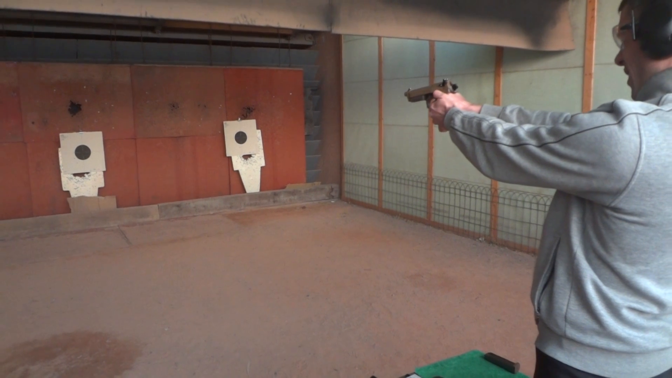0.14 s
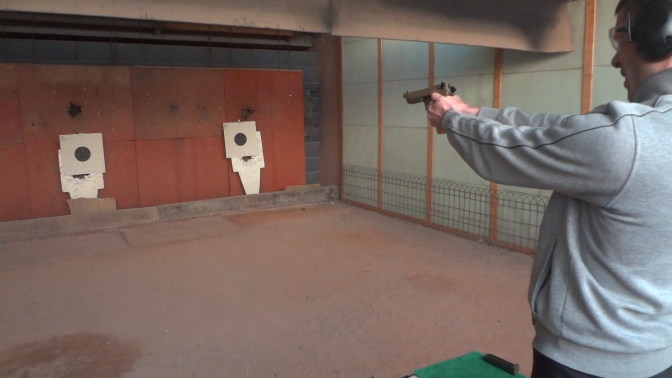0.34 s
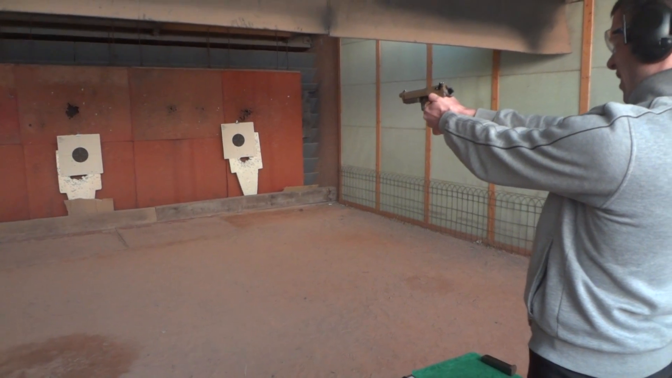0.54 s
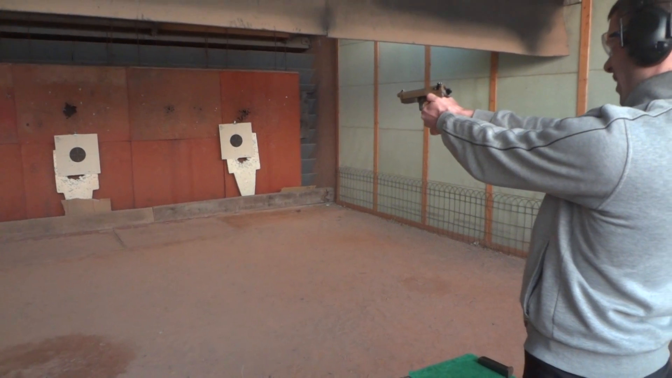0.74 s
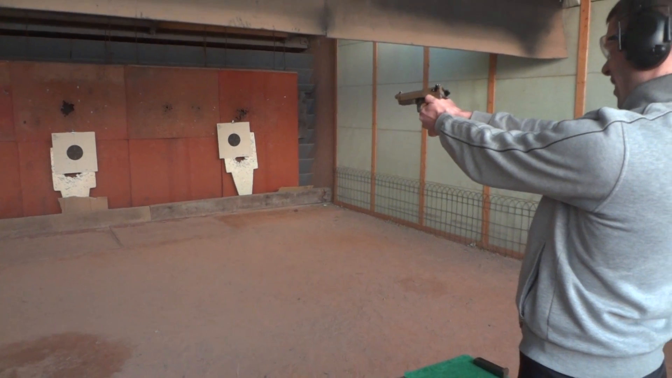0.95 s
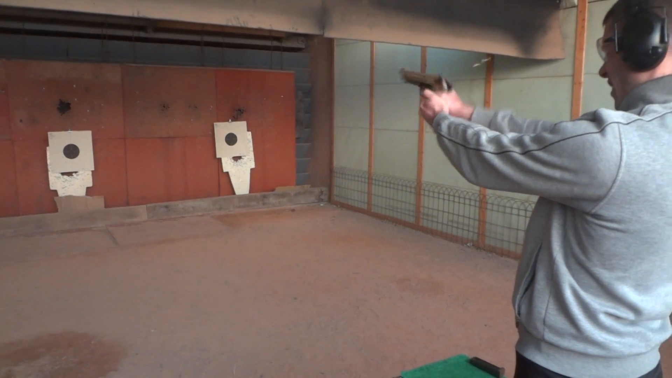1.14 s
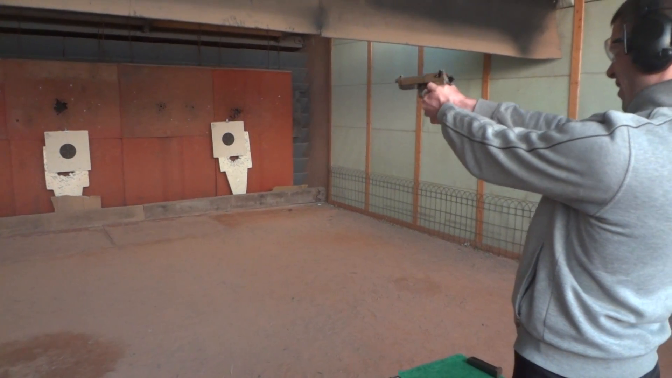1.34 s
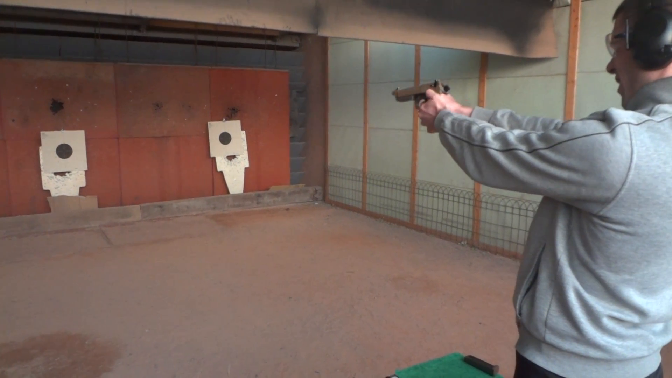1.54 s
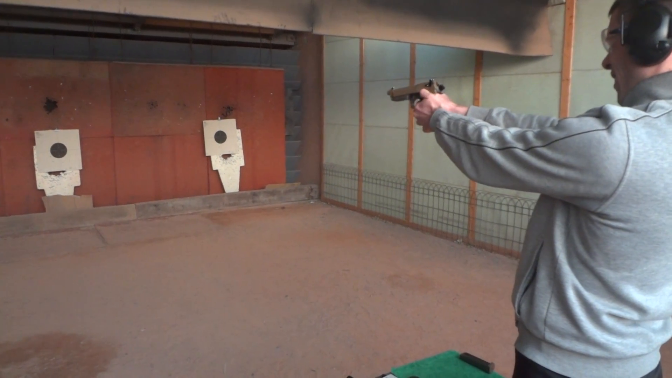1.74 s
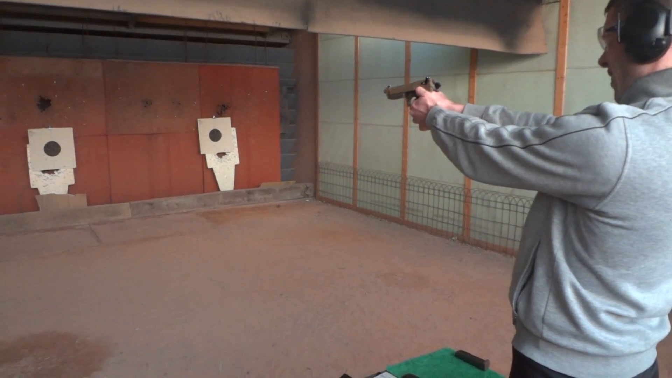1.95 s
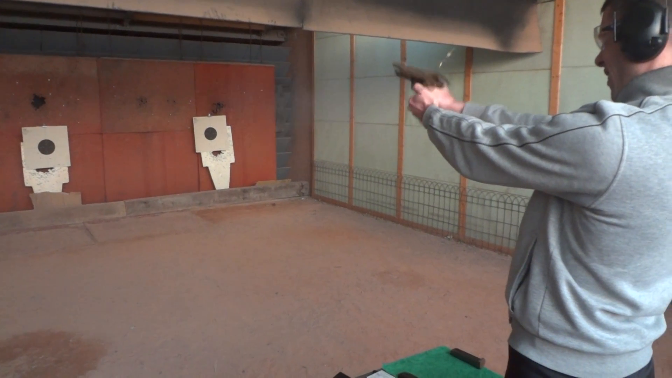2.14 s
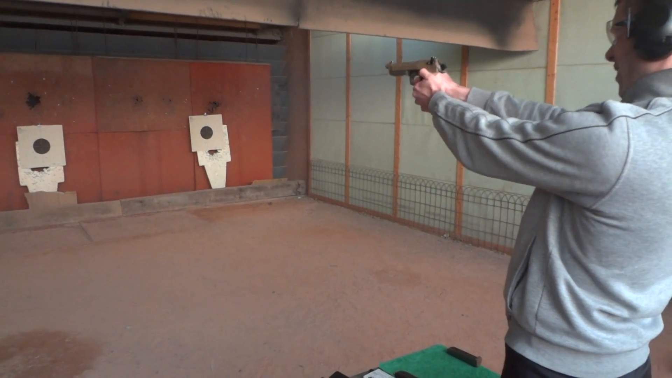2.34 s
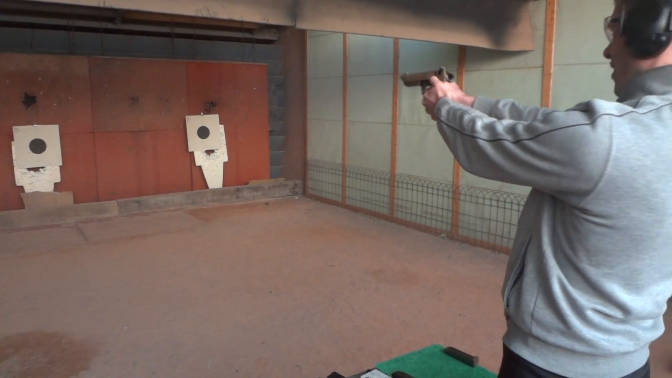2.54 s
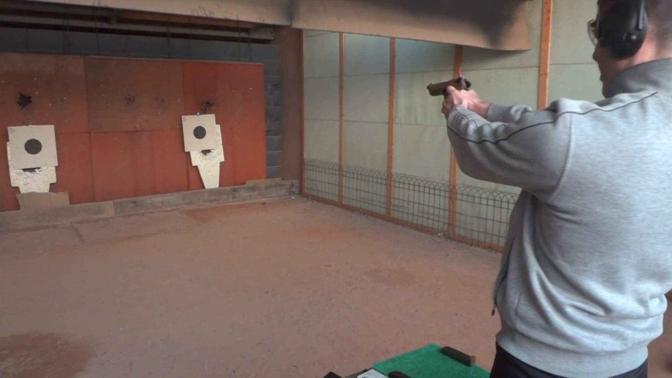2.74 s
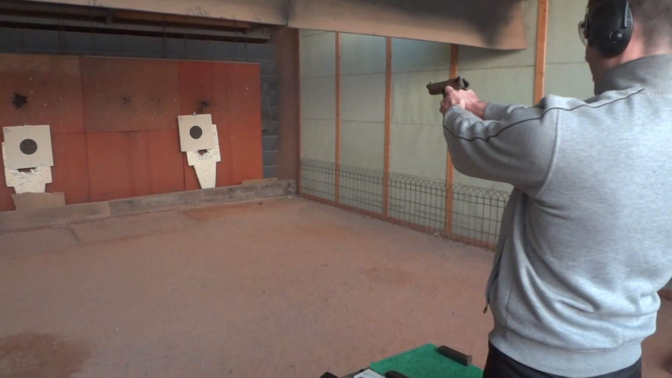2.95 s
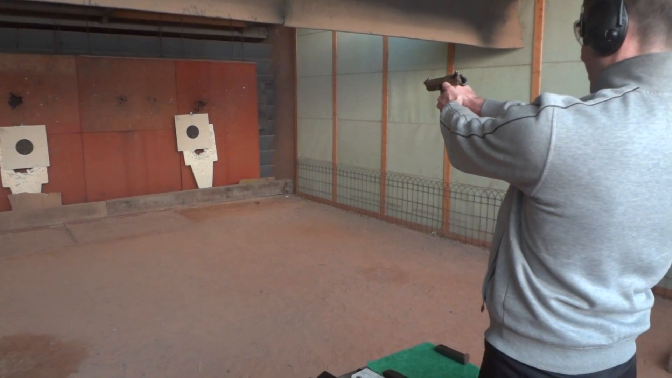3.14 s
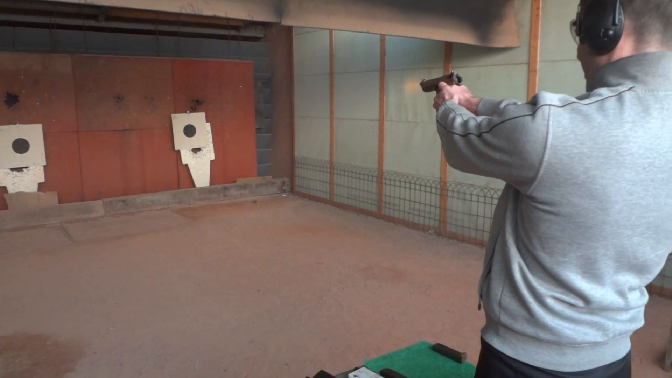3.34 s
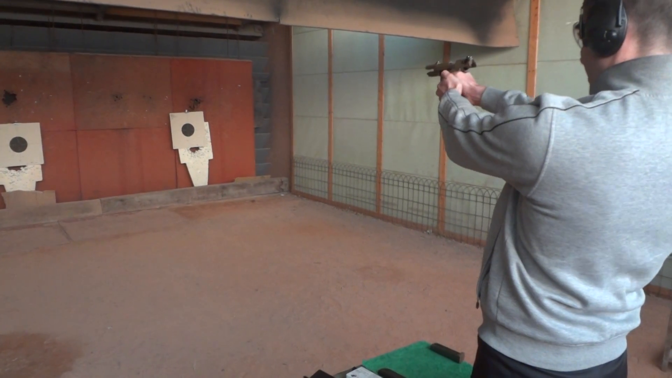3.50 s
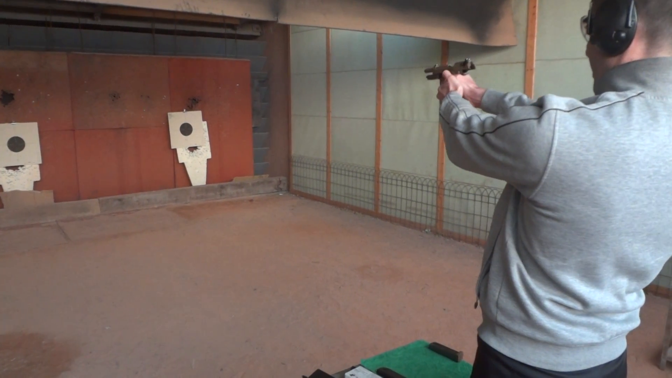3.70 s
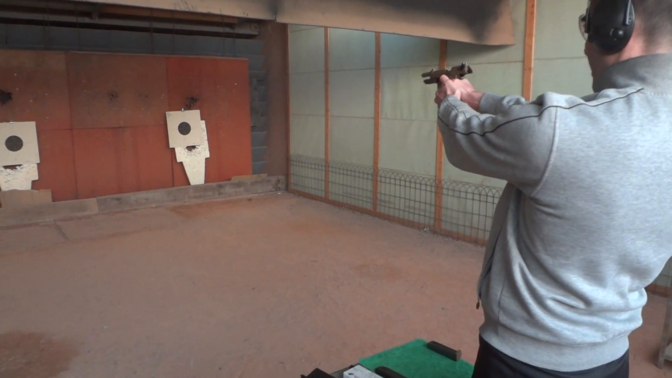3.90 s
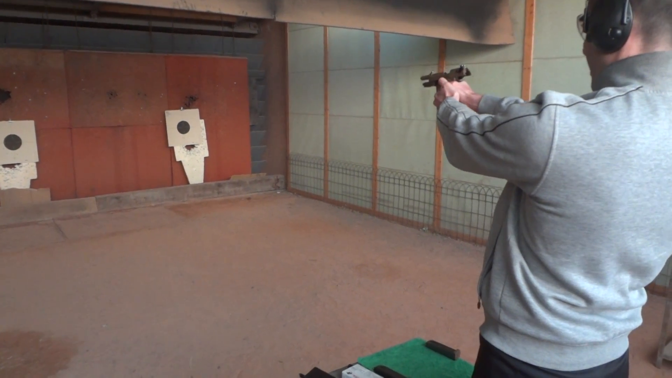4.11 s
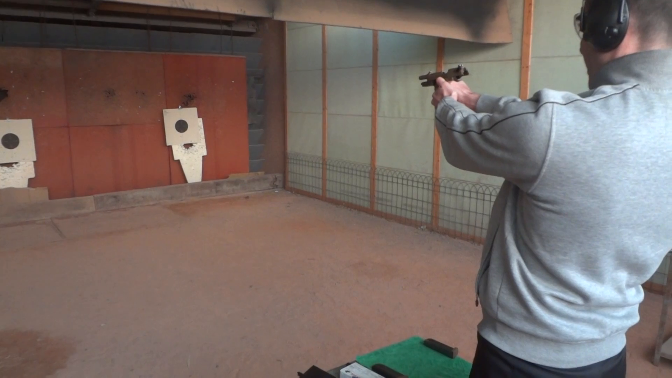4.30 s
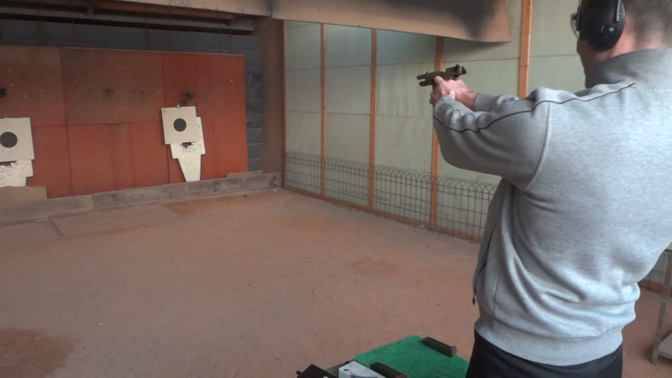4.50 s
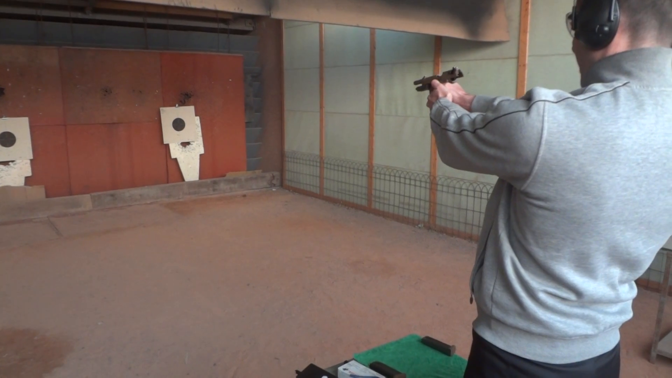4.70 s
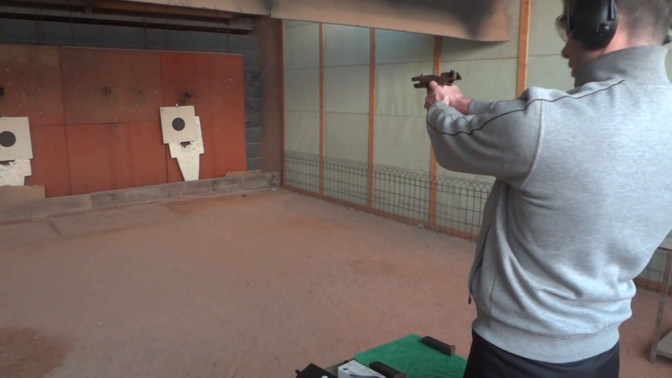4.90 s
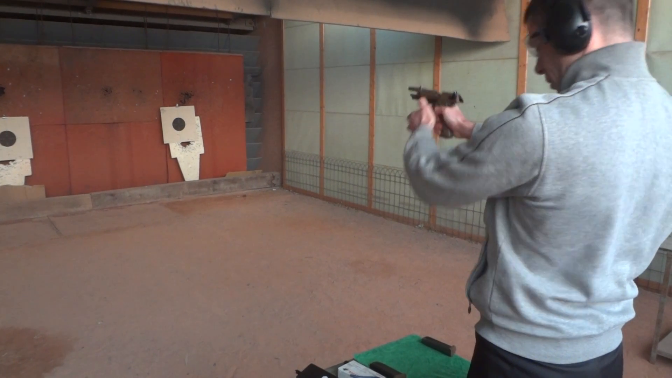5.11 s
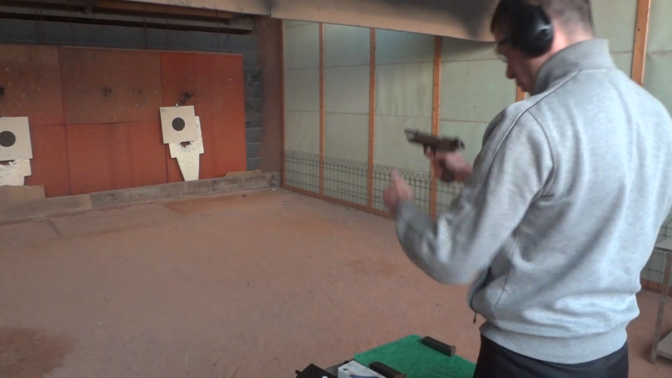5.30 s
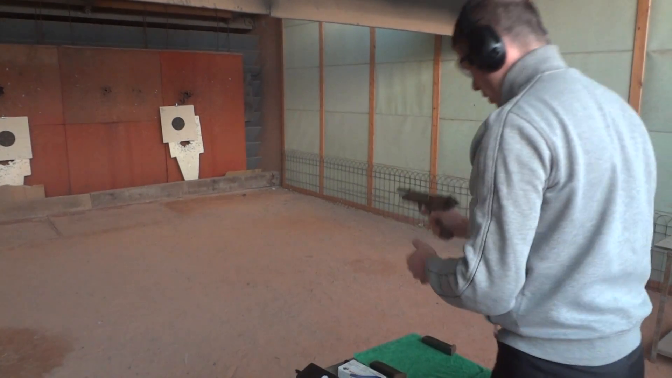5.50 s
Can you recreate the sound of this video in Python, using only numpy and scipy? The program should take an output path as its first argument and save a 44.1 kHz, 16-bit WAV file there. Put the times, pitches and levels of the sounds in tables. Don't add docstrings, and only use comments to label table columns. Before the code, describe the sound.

In a hard-walled indoor shooting range, low ventilation hum runs for about a second before three spaced pistol shots. Each cracks sharply, then a dense, compressed roar echoes off the walls and dies away. Brass cases ping and knock on bench and floor after each shot. The fans fade and cloth faintly rustles at the end. A small stereo camera microphone near the shooter overloads.

```python
import sys
import numpy as np
from scipy import signal
from scipy.fft import rfft, irfft
from scipy.io import wavfile

SR = 44100
rng = np.random.default_rng(int(sys.argv[2]) if len(sys.argv) > 2 else 0)


def master_out(mix):
    frames = np.transpose(np.atleast_2d(mix))
    ceiling = np.clip(frames, -1, 1)
    pcm = np.round(ceiling * 32767).astype(np.int16)
    wavfile.write(sys.argv[1], SR, pcm)


def nominal_scale(level):
    x = np.asarray(level, float) / 20
    return 10 ** x


N = 245195
TAIL = int(2.2 * SR)


def sine(hz, t):
    return np.sin(2 * np.pi * hz * t)


def bump(t, centre_s, width_s):
    return np.exp(-((t - centre_s) / width_s) ** 2)


def fade(t, t60):
    return np.exp(-np.log(1000) * t / np.maximum(t60, .003))


def build(t, rise):
    return 1 - np.exp(-(t / rise) ** 3)


def arrive(t, hz):
    return 1 - np.exp(-t * hz / 5.4)


def on_log(hz, table, column):
    rows = np.array(table, float)
    return np.interp(np.log(np.maximum(hz, 1)), np.log(rows[:, 0]), rows[:, column])


def band(x, hz, octaves):
    f = np.maximum(np.fft.rfftfreq(x.shape[-1], 1 / SR), 1)
    y = irfft(rfft(x) * np.exp(-(np.log2(f / hz) / octaves) ** 2), x.shape[-1])
    return y / np.sqrt(np.mean(y ** 2))


def add(out, s, x):
    i = int(s * SR)
    out[..., i:i + x.shape[-1]] += x[..., :N - i]


# (frequency [Hz], level per band at the blast [dB], t60 [s])
HALL_BANDS = [(45, -18.5, 0.18), (90, -20, 0.8), (150, -14.5, .6), (260, -2, .58), (430, 2, 0.41),
              (700, 8.5, 0.43), (1020, 5, 0.5), (1565, 0.5, 0.39), (2200, -3, 0.44), (3500, -1.5, 0.45),
              (5900, -5.5, 0.44), (9000, -4.5, .36), (12100, -7.5, .31), (14400, -11, 0.5),
              (16000, -12, .22)]
# (delay [s], level over the roar [dB])
WALL_ECHOES = [(.022, 1), (.043, 3.5), (0.065, 2.5), (.087, 6.5), (.121, -0.5), (.138, 7.5), (.152, 1.5),
               (.2, 7.5), (.247, 7), (.3, 7.5)]
PATCHY_DB, PATCHY_HZ = 2.0, 14.


def hall_air(pattern, fresh, kept, stretch):
    t, out = np.arange(TAIL) / SR, 0
    slaps = 1 + sum((nominal_scale(db) - 1) * bump(t, s, 0.0022) for s, db in WALL_ECHOES)
    flutter = 1 + 0.058 * np.cos(2 * np.pi * 44 * t)
    for hz in 40 * 2 ** np.arange(0, 8.8, .4):
        same = np.clip(kept, 0, 1) ** (1 + hz / 700)
        air = band(same * pattern + np.sqrt(1 - same ** 2) * fresh, hz, 0.26)
        air *= nominal_scale(PATCHY_DB * min(900 / hz, 1) * band(rng.standard_normal(TAIL), PATCHY_HZ, 0.95))
        longest_t60 = .57 * (4000 / hz) ** .45
        t60 = stretch * min(on_log(hz, HALL_BANDS, 2), longest_t60)
        sharp = (slaps * flutter) ** (kept * min(hz / 1800, 1))
        out = out + air * sharp * arrive(t, hz) * nominal_scale(on_log(hz, HALL_BANDS, 1)) * fade(t, t60)
    return out


BOOTH_DB, BOOTH_HZ, BOOTH_T60_S = 15, 1102, 0.043
WHOOP_DB, WHOOP_HZ, WHOOP_HZ_PER_S = 12.5, 268.6, 9500
WHOOP_PEAK_S, WHOOP_WIDTH_S = .03, .022


def booth_and_whoop(t, kept):
    booth = nominal_scale(BOOTH_DB) * fade(t, BOOTH_T60_S) * sine(BOOTH_HZ, t)
    whoop = sine(WHOOP_HZ + WHOOP_HZ_PER_S * t / 2, t) * bump(t, WHOOP_PEAK_S, WHOOP_WIDTH_S)
    return nominal_scale(WHOOP_DB) * kept * whoop - booth


# (frequency [Hz], t60 [s], level after shot 1, 2, 3 [dB], build-up
# [s])
PANEL_MODES = [(119.7, 0.9, -16, -23, -21.5, .1), (229.4, 0.44, 9.5, 7, 3.5, 0.12),
               (259, 2.3, -35.5, -42.5, -51.5, .1), (255.2, 0.51, 3.5, 5, 0, 0.21),
               (471, 0.44, -2, -4.5, -10.5, 0.037), (528, 0.25, -21.5, -9.5, -12.5, 0.075),
               (639, 0.4, 5.5, 5.5, 6, 0.18), (653, 2.2, -47, -48.5, -60, .1),
               (665, 0.49, 0, 3, -3.5, 0.024), (700, .42, 1, 2, -2.5, 0.047), (744, 0.48, 7, 6, 6, .08),
               (784, 0.47, 12, 12, 11.5, 0.12),
               (852.2, 2, -35.5, -51.5, -56, .1), (858, 0.26, -6, 2, -4, 0.044),
                (920, 0.31, -10, -1, 1, .04), (997, 0.41, -4, -5, -2.5, .05),
                (1343, 0.55, -15, -20, -25, .06), (2260, 0.62, -23, -36, -40.5, .06),
                (4500, 0.47, -25, -32, -35.5, 0.054)]


def panels(t, shot):
    out = np.zeros(TAIL)
    for hz, t60, *db, rise in PANEL_MODES:
        restless = nominal_scale((1.54 + hz / 900) * band(rng.standard_normal(TAIL), 4.0 + hz / 250, 1.0))
        out += nominal_scale(db[shot]) * restless * build(t, rise) * fade(t, t60) * sine(hz, t)
    return out


# (frequency [Hz], t60 [s], level after shot 1, 2, 3 [dB], build-up [s])
TWIN_MODES = [(47.8, 1.3, -20.5, -23, -25.5, 0.21), (755.5, 0.75, -34.5, -36.5, -13.5, 0.25),
              (356.2, 2.14, -24.5, -27.5, -43, 0.12)]
TWIN_BEAT_HZ = [3.05, 1.9, .735]


def twin_panels(t, shot):
    out = np.zeros(TAIL)
    for (hz, t60, *db, rise), beat in zip(TWIN_MODES, TWIN_BEAT_HZ):
        pair = sine(hz + beat / 2, t) + .88 * sine(hz - beat / 2, t)
        out += nominal_scale(db[shot]) * build(t, rise) * fade(t, t60) * pair
    return out


def hall(pattern, kept, stretch, linger_db, shot):
    t = np.arange(TAIL) / SR
    fresh = rng.standard_normal((2, TAIL))
    out = hall_air(pattern, fresh, kept, stretch)
    out += nominal_scale(linger_db) * band(fresh, 220., 1.3) * fade(t, 1.5)
    out[0] += booth_and_whoop(t, kept) + panels(t, shot) + twin_panels(t, shot)
    return out


# (time [s], hall level [dB], crack level [dB],
# share of the hall echo pattern kept from the first stance [0-1], lingering rumble level [dB])
BLASTS = [
    (1.1406, 1.5, -15, 0.94, -31),
    (2.1608, -1.5, -12, .93, -39.5),
    (3.4076, -4, -14.5, .55, -41.5),
]
DEAF_S = .0066
DECAY_STRETCH, STRETCH_PER_DB = 0.82, 0.0107


def shots():
    out, pattern = np.zeros((2, N)), rng.standard_normal((2, TAIL))
    for k, (s, db, _, kept, linger_db) in enumerate(BLASTS):
        out[:, int((s + .001) * SR):] = 0
        stretch = DECAY_STRETCH + STRETCH_PER_DB * db
        add(out, s + DEAF_S, nominal_scale(db) * hall(pattern, kept, stretch, linger_db, k))
    return out


CRACK_S = .0021
HAMMER_DB, HAMMER_HZ, HAMMER_EARLY_S = -47, 4200, .006


def muzzle_cracks():
    out, t = np.zeros((2, N)), np.arange(SR // 2) / SR
    for s, _, db, *_ in BLASTS:
        noise = rng.standard_normal(len(t))
        torn = np.tanh(0.99 * band(noise, 3200.0, .9) + .6 * band(noise, 9000.0, .5))
        torn *= np.minimum(t / .001, 1) ** 2 * (t < CRACK_S)
        late = np.maximum(t - CRACK_S, 0)
        slack = .5 * (t >= CRACK_S) * np.exp(-late / 0.0042) * np.cos(2 * np.pi * 150 * late)
        add(out, s, nominal_scale(db) * (torn + slack) * nominal_scale([[-.5], [.5]]))
        hammer = band(noise[::-1], HAMMER_HZ, .7) * fade(t, .03)
        add(out, s - HAMMER_EARLY_S, nominal_scale(HAMMER_DB) * hammer)
    return out


# (time [s], peak level [dB], centre [Hz], left minus right [dB])
CASE_KNOCKS = [(1.97, -55, 3970, -10), (1.976, -55, 9000, 7.5), (2.851, -44, 554, -7),
               (2.861, -46, 700, -10), (2.88, -51, 790, -1.5), (2.897, -52.5, 700, -5),
               (3.108, -54, 1300, -11), (3.1085, -49, 3250, -8), (3.1155, -56.5, 3500, -7),
               (3.121, -54, 2780, -9), (3.1295, -56, 9000, 3), (4.037, -58, 3794, 0),
               (4.046, -63, 4200, 0.5), (4.064, -68, 4990, 0), (4.1324, -51, 6470, 4),
               (4.141, -58, 6300, -8.5), (4.156, -63, 6800, -1), (4.2158, -47.5, 1120, -7),
               (4.2165, -63, 2200, -4), (4.2166, -54, 4500, -6), (4.2245, -47, 11000, -0.5),
               (4.392, -68, 5000, 0), (4.5824, -56, 4165, -1), (5.31, -66, 4500, 8)]
KNOCK_T60_S, KNOCK_T60_SLOPE = 0.034, -0.76
TICK_DB, TICK_T60_S = -7, .008


def case_knocks():
    out, t = np.zeros((2, N)), np.arange(8192) / SR
    for s, db, hz, pan_db in CASE_KNOCKS:
        noise = rng.standard_normal((2, 8192))
        burst = band(noise, hz, 0.46) * np.minimum(t * hz / 0.65, 1)
        t60 = KNOCK_T60_S * (hz / 1000) ** KNOCK_T60_SLOPE
        burst *= fade(t, t60) + 0.1 * fade(t, 0.37)
        burst += (hz > 1000) * nominal_scale(TICK_DB) * band(noise, 2.7 * hz, 1.6) * fade(t, TICK_T60_S)
        pan = nominal_scale(db + np.array([[pan_db], [-pan_db]]) / 2)
        add(out, s, pan * (burst[0] + 0.11 * burst * [[1], [-1]]) / 2)
    return out


# (time [s], level [dB], frequency [Hz], beat [Hz], t60 [s])
CASE_PINGS = [
    (1.977, -58.5, 11000, 57, 0.17),
    (2.311, -43, 10980, 2, 0.44),
    (3.131, -65.5, 11020, 35, 0.41),
    (3.79, -70.5, 8350, 20, .12),
    (4.105, -73, 9000, 15, 0.19),
    (4.105, -82, 13350, 12, 0.21),
    (4.2165, -50.5, 10960, 45.4, 0.12),
]


def case_pings():
    out, t = np.zeros((2, N)), np.arange(SR // 2) / SR
    for s, db, hz, beat, t60 in CASE_PINGS:
        pair = sine(hz - beat / 2, t) + .7 * sine(hz + beat / 2, t)
        add(out, s, nominal_scale(db) * pair * fade(t, t60) * np.minimum(t / .004, 1) * nominal_scale([[-1.5], [1.5]]))
    return out


RUSTLE_END_S, RUSTLE_DB, RUSTLE_DB_PER_S = 5.536, -74, 28


def sleeve():
    t = np.arange(N) / SR
    rustle = band(rng.standard_normal((2, N)), 850., .5)
    return rustle * nominal_scale(RUSTLE_DB + RUSTLE_DB_PER_S * (t - RUSTLE_END_S))


# (frequency [Hz], level [dB])
MOTOR_LINES = [(48.2, -77), (99.9, -74.5), (121.1, -70.5), (221.1, -75.5), (242.2, -81), (295.6, -75),
               (300, -81), (412, -80.5), (834.7, -71.5)]
# (frequency [Hz], level per Hz [dB])
DUCT_AIR = [(12, -45.5), (20, -13), (54, -9), (118, 1.5), (141, -5), (172, -16.5), (299, -5.5),
            (349, -13.5), (520, -16.5), (742, -16), (829, -10.5), (990, -20.5), (4000, -33), (5200, -63),
            (8800, -120)]
DUCT_DB = -64.5
FAN_OFF_S, FAN_RUNDOWN_S, FAN_DROP_DB = 2.7, .9, -9
MOTOR_DROP_DB = -3


def ventilation():
    t, f = np.arange(N) / SR, np.fft.rfftfreq(N, 1 / SR)
    air = irfft(rfft(rng.standard_normal((2, N))) * nominal_scale(on_log(f, DUCT_AIR, 1)), N)
    air *= nominal_scale(DUCT_DB) / np.std(air)
    for hz, db in MOTOR_LINES:
        waver = nominal_scale(3.0 * band(rng.standard_normal(N), 5., 1.1))
        line = np.sin(2 * np.pi * (hz * t + rng.random()))
        air[0] += np.sqrt(2) * nominal_scale(db + MOTOR_DROP_DB * (t > FAN_OFF_S)) * waver * line
    fan_db = FAN_DROP_DB * (1 - np.exp(-np.maximum(t - FAN_OFF_S, 0) / FAN_RUNDOWN_S))
    return air * nominal_scale(fan_db)


# (frequency [Hz], likeness [0-1], left lead [rad], left minus right [dB])
MIC_PORTS = [(30, .995, -.2, -.8), (125, .99, -.5, -1.6), (250, .97, -.5, -2.3), (600, .95, -.65, -4.2),
             (1200, .75, -.45, -4.8), (2500, .74, -.1, -2.8), (5000, .8, .1, -.9), (9000, .93, 0, -.4),
             (14000, .98, 0, -.2)]


def ports(fields):
    f = np.fft.rfftfreq(N, 1 / SR)
    like, lead, pan_db = (on_log(f, MIC_PORTS, column) for column in (1, 2, 3))
    direct, cross = rfft(fields)
    apart = np.sqrt((1 - np.clip(like, 0, 1)) / 2) * cross
    tilt = nominal_scale(pan_db / 2) * np.exp(.5j * lead)
    return irfft([(direct + apart) * tilt, (direct - apart) / tilt], N)


def scene():
    return ports(shots() + sleeve() + ventilation()) + case_knocks() + case_pings()


CEILING, LOPSIDED = 5.6, 0.21
COUPLING_HZ = 120


def input_stage(dry):
    hot = np.tanh(dry / CEILING + LOPSIDED) - np.tanh(LOPSIDED)
    hot *= CEILING * np.cosh(LOPSIDED) ** 2
    coupling = signal.butter(2, COUPLING_HZ, "high", fs=SR, output="sos")
    return dry + signal.sosfilt(coupling, hot - dry)


LIMIT_DB, RELEASE_DB_PER_S, RELEASE_KNEE_DB = -24, 100, 0.5
FIRST_GRIP_DB, FIRST_GRIP_S = -3.5, 0.022
OVERSHOOT_DB, OVERSHOOT_S, OVERSHOOT_WIDTH_S = 2, .27, .07


def limiter_gain():
    gain_db, t = np.zeros(N), np.arange(SR // 2) / SR
    for s, hall_db, *_ in BLASTS:
        swing_db = OVERSHOOT_DB * bump(t, OVERSHOOT_S, OVERSHOOT_WIDTH_S)
        grip_db = FIRST_GRIP_DB * np.exp(-t / FIRST_GRIP_S)
        climb_db = LIMIT_DB - hall_db + RELEASE_DB_PER_S * t + grip_db
        add(gain_db, s, swing_db - RELEASE_KNEE_DB * np.logaddexp(0, -climb_db / RELEASE_KNEE_DB))
    return nominal_scale(gain_db)


HISS_DB, HISS_SIDE = -71, 0.33


def amplifier_hiss():
    noise = rng.standard_normal((2, N))
    hiss = nominal_scale(HISS_DB) * (noise[0] + HISS_SIDE * noise[1] * np.array([[1], [-1]]))
    return signal.lfilter([.7], [1, -.3], hiss)


TOP_HZ = 15800
SINK_FROM_S, SINK_TO_S, SINK_HZ_PER_S = .16, .34, 24000


def treble_dropouts(x):
    f, t, z = signal.stft(x, SR, nperseg=2048)
    top_hz = np.full(len(t), 1. * TOP_HZ)
    for s, *_ in BLASTS:
        top_hz -= SINK_HZ_PER_S * np.maximum(t - s - SINK_FROM_S, 0) * (t < s + SINK_TO_S)
    low = top_hz < 15300
    top_hz += low * 690 * rng.integers(-1, 2, len(t))
    return signal.istft(z * (f[:, None] < top_hz), SR, nperseg=2048)[1][:, :N]


def band_limit(x):
    return signal.sosfilt(signal.butter(12, 16970, fs=SR, output="sos"), x)


def record(dry):
    limited = input_stage(dry) * limiter_gain()
    heard = treble_dropouts(limited + amplifier_hiss()) + muzzle_cracks()
    mix = np.clip(heard, -1, 1)
    return band_limit(mix)


dry = scene()
out = record(dry)
master_out(out)
```